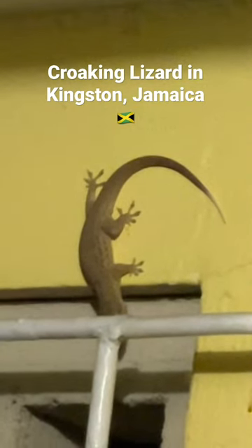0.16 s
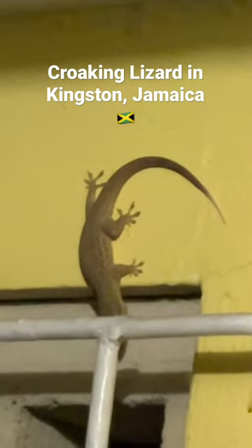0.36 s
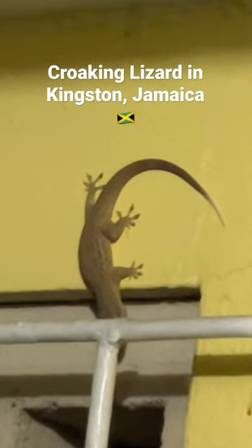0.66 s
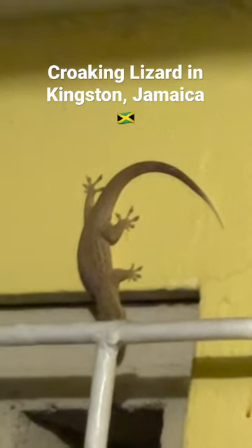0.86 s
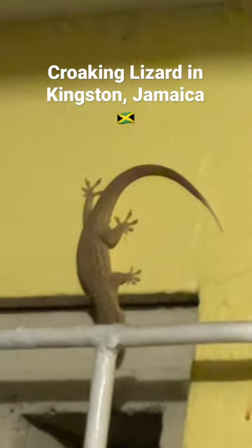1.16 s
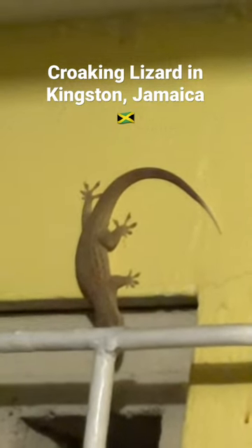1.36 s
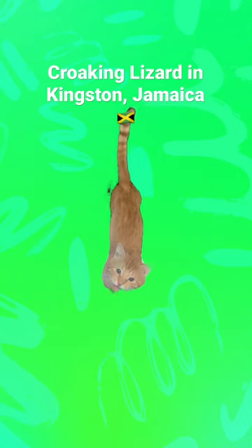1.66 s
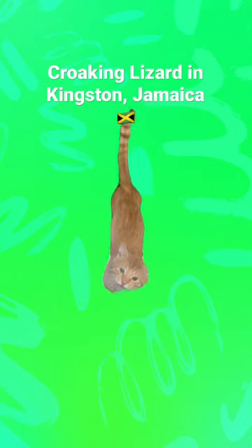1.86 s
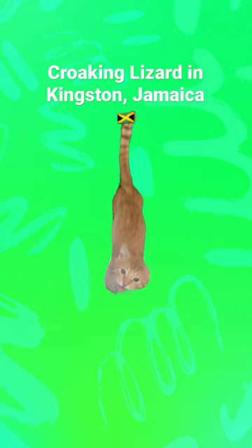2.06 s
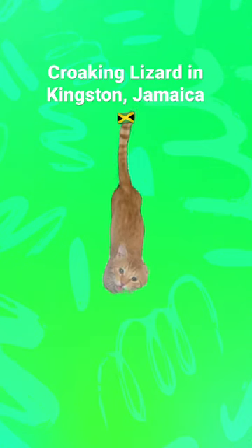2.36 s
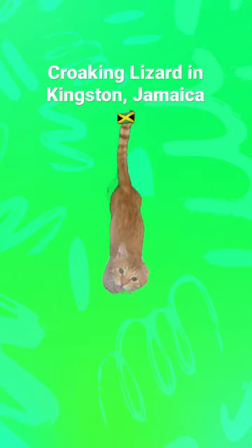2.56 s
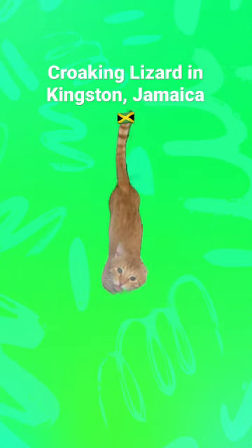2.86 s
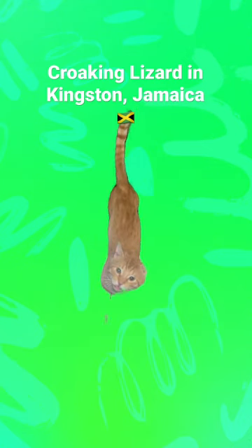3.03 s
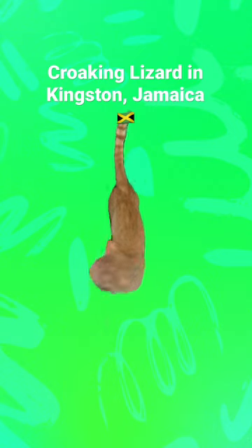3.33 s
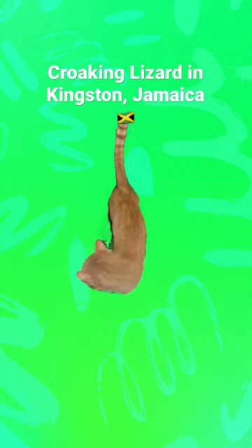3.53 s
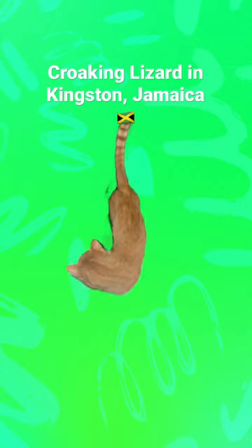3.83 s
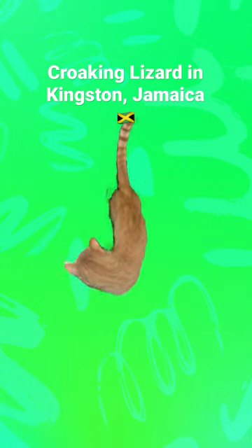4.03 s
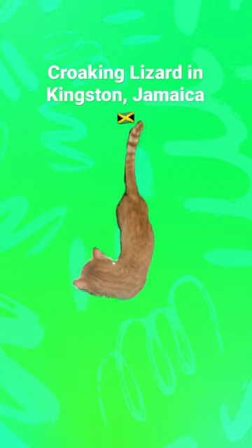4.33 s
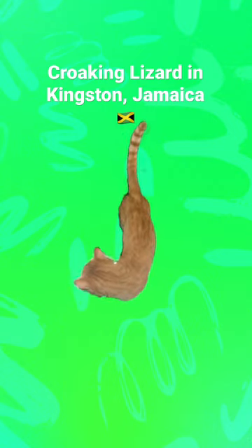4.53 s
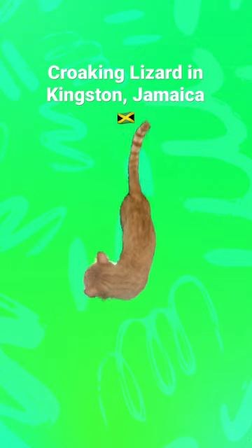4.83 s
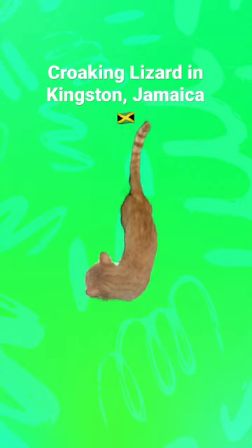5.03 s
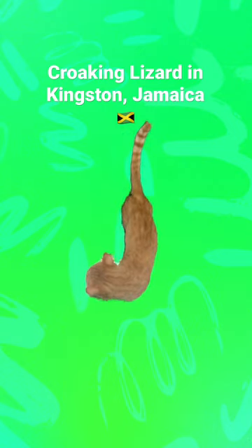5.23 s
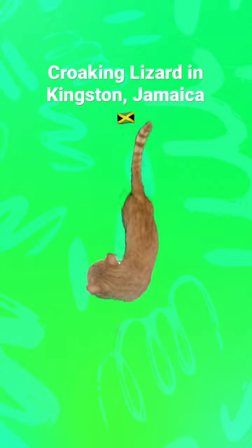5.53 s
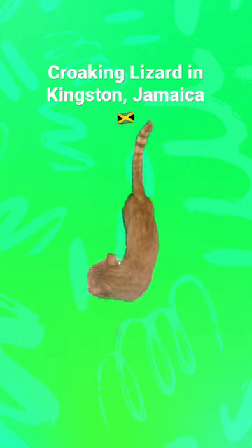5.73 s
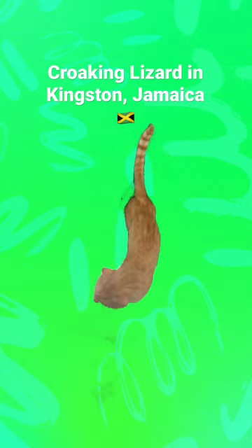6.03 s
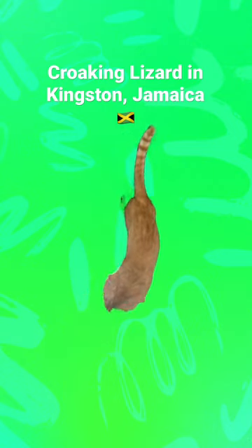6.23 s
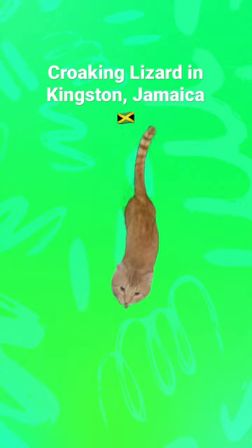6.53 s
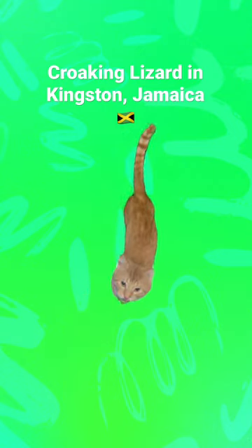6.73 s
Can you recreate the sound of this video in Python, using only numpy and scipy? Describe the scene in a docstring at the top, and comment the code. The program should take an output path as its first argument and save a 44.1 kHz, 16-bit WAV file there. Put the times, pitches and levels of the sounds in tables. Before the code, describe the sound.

A night yard heard through a hand-held phone. From 0 to 1.66 seconds, low town rumble lies under a high, throbbing cricket chorus, with a closer insect giving brief buzzing chirps near 0.3 and 0.9 and a clipped one at the end. A silence of about 0.04 seconds follows. At 1.7 a loud cat meow bursts in with a bright, hard edge, sinking gradually, growing rougher and wavering before shutting with a small breathy pop near 2.85. Beneath it, a gecko makes thirteen dry, hollow clicks from 1.71 to 2.45, strongest around 2.16. A blurred chirp follows at 2.9. The rumble is now softer; near chirps recur roughly every 0.6 seconds to the end at about 6.9, with faint echoes. A thin far trill comes and goes after 4.1. A scuff and crisp tick fall around 4.5, soft handling rustle from 5.2 to 5.9, and tiny scuffs near 6.2.

```python
"""A yard at night, heard through a hand-held phone in two shots with a brief silence between.
Far crickets (throbbing noise bands, pulsed calls, a thin trill) lie over town rumble (coloured noise).
A near insect chirps in trains of falling tones. The second shot opens on a long cat meow (summed
partials and breath noise) over a gecko's clicks (decaying ring and crack). A blurred chirp, ticks,
scuffs and a handling rustle (noise bursts) follow."""
import sys
import numpy as np
from scipy import signal
from scipy.fft import rfft, irfft
from scipy.io import wavfile
from scipy.ndimage import uniform_filter1d

SR = 44100
rng = np.random.default_rng(int(sys.argv[2]) if len(sys.argv) > 2 else 0)


def output_pcm(signal):
    """Save a mono or channel-first signal as 16-bit PCM at the path in sys.argv[1].

    Samples are clipped to [-1, 1] before scaling.
    """
    pcm = np.clip(np.atleast_2d(signal).T, -1, 1) * 32767
    wavfile.write(sys.argv[1], SR, np.round(pcm).astype(np.int16))


N = 303408

# silence between the shots: (start [s], end [s])
SILENCE_S = (1.6645, 1.7021)

# town rumble colour, first and second shot: (frequency [Hz], gain [dB])
TOWN_1_COLOUR = [(15, -67), (25, -16.5), (40, -14), (60, 6.5), (141, -4), (198, -4), (372, -12), (570, -11),
                 (914, -9), (1640, -16.5), (3220, -35), (4410, -47), (5400, -53), (7020, -90),
                 (11900, -120)]
TOWN_2_COLOUR = [(15, -79), (25, -29), (86, 3.5), (162, -9.5), (194, -2.5), (290, -14), (545, -16.5),
                 (623, -17.5), (1000, -21.5), (2570, -41), (2880, -44.5), (4510, -44.5), (5400, -53),
                 (7020, -77), (11900, -120)]
TOWN_1_RMS_DB, TOWN_2_RMS_DB = -50.5, -58
# wavering tones, second shot: (frequency [Hz], width [Hz], level [dB])
HUM_BANDS = [(104, 13, -68), (199.7, 6.9, -68.5), (534, 3, -75), (10200, 5.5, -106)]

# cricket chorus: (frequency [Hz], width [Hz], level [dB], throb rate [1/s], throb depth [dB], throb phase zero [s])
CHORUS_BANDS = [(5890, 500, -83.5, 6.75, 2.5, 3.13), (6294, 300, -74, 5.5, 1, 4.4),
                (6650, 300, -71.5, 4.3, 2, 5), (6900, 200, -70, 3, -0.5, 3.1),
                (7160, 300, -75, 2.1, 3.5, 3.1)]
# steadiest cricket: (time [s], level [dB])
STEADY_LEVEL = [(0, -65.5), (1.66, -74), (3.2, -72.5), (4.8, -66.5), (5.7, -69), (6.88, -66)]
# highest cricket, one row per shot: (first peak [s], end [s])
HIGH_SPANS = [(.13, 1.5), (2.17, 7.6)]
HIGH_PERIOD_S, HIGH_WIDTH_S, HIGH_HZ = 0.322, 0.075, 7120
HIGH_NOISE_DB, HIGH_SCATTER_DB = -63, 2.5  # noise level before it modulates the tone
# thin far trill: (start [s], length [s], level [dB])
TRILL_SPANS = [(4.095, 0.19, -91), (4.34, 0.5, -87.5), (5.168, 0.77, -85), (6.142, 0.18, -83.5),
               (6.445, 0.05, -92), (6.665, 0.19, -83.5)]
TRILL_HZ, TRILL_FADE_S = 4390, 0.074

# near insect: (time [s], level [dB], wing strokes [count], pitch [Hz])
CHIRPS = [(0.321, -55, 10, 3183), (0.883, -53.5, 10, 3180), (1.645, -48, 2, 3215), (1.923, -49, 9, 3110),
          (2.535, -50.5, 10, 3183), (3.299, -54.5, 10, 3162), (3.893, -53.5, 9, 3166),
          (4.552, -53, 9, 3146), (5.159, -54.5, 10, 3170), (5.802, -53.5, 9, 3155), (6.401, -53, 9, 3145)]
# its overtones: (multiple of the pitch [1], level against the tone [dB])
CHIRP_OVERTONES = [(3, -25.5), (4, -41)]
# wing noise under each stroke: (frequency [Hz], width [Hz], level against the stroke [dB])
SCRAPE_BANDS = [(3450, 480, -19), (10400, 2400, -34), (13000, 1500, -35.5)]
STROKE_S = 0.0116
FAR_WALL_S, FAR_WALL_DB = 0.115, -17  # one clear reflection repeats each chirp

# meow: (time [s], pitch [Hz], 2nd partial [dB], 3rd partial [dB], upper mouth resonance [dB])
MEOW = [(1.702, 792, -57, -32, -56), (1.708, 797.4, -48.5, -28, -59.5), (1.798, 782, -44.5, -34, -53.5),
        (1.824, 790.5, -46.5, -31.5, -53), (2.026, 750.8, -40.5, -41.5, -51.5),
        (2.104, 734, -38.5, -37.5, -52), (2.172, 756, -38.5, -42, -52), (2.228, 739, -34.5, -38.5, -49.5),
        (2.268, 731.3, -36.5, -42, -49), (2.436, 735.7, -32, -43.5, -50), (2.502, 716.7, -29.5, -42, -51),
        (2.524, 709, -28, -49, -49), (2.606, 722, -24.5, -45, -51), (2.648, 704, -27, -56, -58.5),
        (2.664, 713.4, -29.5, -51.5, -55), (2.726, 683.3, -32.5, -55.5, -57),
        (2.778, 698.5, -30.5, -50, -57), (2.814, 699.3, -44, -52.5, -56), (2.826, 699.6, -35.5, -53, -59),
        (2.85, 730.5, -40.5, -57, -59), (2.866, 704, -45, -86, -73), (2.87, 710, -53, -75, -71)]
# throat colour of partials 4 and 5 against the upper resonance: (frequency [Hz], gain [dB])
THROAT_COLOUR = [(2740, -19.5), (2850, -4), (2940, -2), (3060, -1), (3150, -8), (3500, -2.5), (3700, -6.5),
                 (3790, -16), (3900, -1), (4000, -4)]
# mouth colour of partials 10 to 19: (frequency [Hz], gain [dB])
MOUTH_COLOUR = [(7000, -3.5), (8000, -2.5), (9000, -13.5), (10000, -11), (11500, -13.5), (13000, -20.5),
                (15000, -30)]
# breath as the mouth shuts, a pop then a sigh: (time [s], level [dB], rise [s], t60 [s])
PUFFS = [(2.848, -50, 0.0084, 0.13), (2.88, -59, 0.029, 0.27)]
# breath colour: (frequency [Hz], width [Hz], level [dB])
PUFF_BANDS = [(650, 300, -3.5), (1940, 2900, -0.5), (3250, 860, -12), (6240, 1600, -6),
              (10200, 4220, -24.5)]
UPPER_MOUTH_HZ, UPPER_WIDTH_HZ = 5700, 470
FUNDAMENTAL_DB, CLOSING_DB, CLOSING_S = -50.5, 7, 0.03  # 1st partial lifts as the mouth shuts
TOP_DB, TOP_FOLLOWS = -60, 0.43  # top partials rise by this share of the 2nd partial's dB
VOICE_ATTACK_S, VOICE_STOP_S = 0.018, 0.0069
ONSET_DB, ONSET_DECAY_S = 13.5, 0.0092  # bright, hard start
TIRES_S, TIRED_FLUTTER_DB = 2.66, 2.5  # from here the voice wavers
SLACK_S, SLACK_HZ_PER_S = 2.856, 7000  # the folds slacken and the pitch drops away

# gecko clicks: (time [s], ring level [dB], throat pitch [Hz], crack level [dB])
CLICKS = [(1.7113, -45, 1810, -37), (1.8791, -40.5, 1940, -39.5), (1.895, -38, 1860, -42),
          (1.9876, -34, 1860, -36.5), (2.0318, -44, 1790, -58), (2.0742, -40, 1850, -53),
          (2.158, -27.5, 1840, -39.5), (2.254, -37.5, 1790, -56), (2.298, -50, 1730, -57.5),
          (2.3276, -44.5, 1790, -51), (2.3707, -41.5, 1797, -47), (2.4069, -39.5, 1720, -39),
          (2.4463, -42.5, 1800, -56)]
CLICK_RING_DECAY_S, CLICK_CRACK_DECAY_S, CLICK_RISE_S = 0.004, 0.0065, 0.00064

# ticks, scuffs and a blurred insect chirp at 2.897 s:
# (time [s], level [dB], frequency [Hz], width [Hz], rise [s], t60 [s])
SMALL_SOUNDS = [(2.897, -51, 3230, 448, 0.013, 0.28), (3.636, -69, 3680, 600, 0.0025, 0.15),
                (4.12, -84, 11000, 3990, .003, 0.04), (4.499, -63.5, 1100, 900, 0.019, .2),
                (4.584, -56.5, 5840, 1200, 0.0011, 0.038), (5.884, -71, 2000, 900, 0.0036, 0.092),
                (5.886, -78, 4900, 900, .003, .05), (6.166, -77, 2300, 1310, 0.0075, 0.18),
                (6.159, -80, 10000, 6000, 0.0022, .03), (6.235, -74.5, 2100, 1300, 0.012, 0.16),
                (6.325, -72.5, 2060, 1287, 0.0068, 0.26)]
# hand rubbing the phone: (time [s], level [dB], rise [s], t60 [s])
RUSTLES = [(5.16, -70.5, .016, 0.43), (5.29, -81, .035, .25), (5.38, -76.5, .02, .5),
           (5.43, -79, 0.026, .5), (5.505, -73, .02, 0.24), (5.66, -78.5, .045, .3), (5.8, -83.5, .025, .4)]
# rub colour: (frequency [Hz], width [Hz], level [dB])
RUSTLE_BANDS = [(2180, 1300, -7.5), (4700, 2500, -4), (7890, 4100, -1), (10790, 2400, -3.5),
                (13400, 2000, -11.5)]

HISS_DB, TOP_HZ = -87, 15700  # microphone noise, upper limit


def undb(db):
    """Decibels to gain."""
    return 10 ** (np.asarray(db) / 20)


def level(x, db):
    """Scale to an rms level."""
    return x * undb(db) / np.sqrt(np.mean(x ** 2))


def curve(rows):
    """Columns of a table at every sample; -150 outside its span."""
    s, *columns = np.transpose(rows)
    return [np.interp(np.arange(N) / SR, s, c, -150, -150) for c in columns]


def colour_db(hz, rows):
    """Table gain at a frequency."""
    return np.interp(hz, *np.transpose(rows))


def band(x, hz, width_hz):
    """Steep resonance: a bell on the frequency axis."""
    f = np.arange(N // 2 + 1) * SR / N
    return irfft(rfft(x) / (1 + ((f - hz) * 2 / width_hz) ** 4), N)


def hiss(bands):
    """Noise in a set of resonances, each at its own rms level."""
    return sum(level(band(rng.standard_normal(N), hz, w), db) for hz, w, db in bands)


def walk(rate):
    """Random levels held 1 / rate s and slewed twice; spread near 1."""
    k = int(SR / rate)
    steps = np.repeat(rng.standard_normal(N // k + 1), k)
    return 1.3 * uniform_filter1d(uniform_filter1d(steps, k), k)[:N]


def bursts(rows):
    """Envelope of overlapping bursts, each a straight rise and an exponential fall."""
    t = np.arange(N) / SR
    return sum(undb(db) * np.clip((t - s) / rise, 0, 1)
               * np.exp(-np.log(1000) * np.maximum(t - s - rise, 0) / t60)
               for s, db, rise, t60 in rows)


def add(out, s, sound):
    """Mix a sound in at time s."""
    i = int(s * SR)
    out[i:i + len(sound)] += sound[:N - i]


def echo(x, t60, wet_db, delay_s):
    """Direct sound plus a decaying cloud of reflections off the walls."""
    t = np.arange(SR) / SR
    cloud = rng.standard_normal(SR) * np.exp(-np.log(1000) * t / t60) * (t > delay_s)
    cloud = cloud / np.sqrt(np.sum(cloud ** 2))
    return x + signal.fftconvolve(x, cloud)[:N] * undb(wet_db)


def town(colour, rms_db):
    """Coloured noise in two bands, below and above 300 Hz, that swell slowly and apart."""
    f = np.arange(N // 2 + 1) * SR / N
    hz, gain_db = np.transpose(colour)
    gain = undb(np.interp(np.log(f + 1), np.log(hz), gain_db))
    noise = irfft(rfft(rng.standard_normal(N)) * gain, N)
    low = band(noise, 0, 600)
    swelling = low * undb(1.2 * walk(4.3)) + (noise - low) * undb(0.93 * walk(1.9))
    return level(swelling, rms_db)


def chorus():
    """Crowds of far singers blur into throbbing noise bands; one band holds steadier."""
    t, out = np.arange(N) / SR, np.zeros(N)
    for hz, width_hz, db, rate, depth_db, peak_s in CHORUS_BANDS:
        throb = np.cos(2 * np.pi * rate * (t - peak_s) + 0.3 * walk(0.84)) + 0.5 * walk(rate)
        out += undb(depth_db * throb + 0.4 * walk(60)) * hiss([(hz, width_hz, db)])
    steady = undb(curve(STEADY_LEVEL)[0] + 0.82 * walk(30))
    return out + steady * hiss([(6496, 170, 0)])


def high_cricket():
    """Bell-shaped calls on a steady beat: a tone modulated by low noise, with a 32 Hz ripple."""
    t, half_s, calls = np.arange(N) / SR, HIGH_PERIOD_S / 2, np.zeros(N)
    for first_s, end_s in HIGH_SPANS:
        from_peak_s = (t - first_s + half_s) % HIGH_PERIOD_S - half_s
        active = (t > first_s - half_s) * (t < end_s)
        calls += np.exp(-(from_peak_s / HIGH_WIDTH_S) ** 2) * active
    calls = calls * (1 + 0.13 * np.sin(2 * np.pi * 32 * t)) * undb(HIGH_SCATTER_DB * walk(3))
    return calls * hiss([(0, 240, HIGH_NOISE_DB)]) * np.sin(2 * np.pi * HIGH_HZ * t)


def far_trill():
    """A thin tone, faded in and out, unsteady in pitch and level."""
    t = np.arange(N) / SR
    envelope = sum(undb(db) * np.clip(np.minimum(t - s, s + length_s - t) / TRILL_FADE_S, 0, 1)
                   for s, length_s, db in TRILL_SPANS)
    phase = 2 * np.pi * np.cumsum(TRILL_HZ + 8 * walk(40)) / SR
    flutter = undb(2 * walk(70) + 2.5 * walk(12))
    return np.sqrt(2) * envelope * flutter * np.sin(phase)


def chirper():
    """Every wing stroke is a tone falling in pitch, with overtones and scrape; the yard smears it."""
    tone, overtones, beat = np.zeros(N), np.zeros(N), np.zeros(N)
    t = np.arange(int(STROKE_S * SR)) / SR
    for s, db, strokes, hz in CHIRPS:
        scatter = rng.standard_normal((12, 3))[:round(strokes)]
        for k, (tune, size, late) in enumerate(scatter):
            # first strokes are softer and sharper
            ratio = 1.03 - 0.061 * t / STROKE_S + 0.0092 * tune + 0.01 * np.exp(-k / 0.69)
            phase = 2 * np.pi * np.cumsum(hz * ratio) / SR
            stroke = undb(db - 14 * np.exp(-k) + 1.9 * size) * np.sin(np.pi * t / STROKE_S)
            start_s = s + k * STROKE_S + 0.001 * late * (k > 0)
            add(tone, start_s, stroke * np.sin(phase))
            add(overtones, start_s, stroke * sum(undb(g) * np.sin(m * phase) for m, g in CHIRP_OVERTONES))
            add(beat, start_s, stroke)
    add(tone, FAR_WALL_S, undb(FAR_WALL_DB) * tone)
    smeared = echo(echo(tone, 0.08, -4.5, 0.002), 0.35, -10, 0.04)
    return smeared + echo(overtones + beat * hiss(SCRAPE_BANDS), 0.15, -6.5, 0.004)


def cat():
    """Partials on a sinking pitch; upper ones pass the mouth's resonances and break up as folds flutter."""
    t = np.arange(N) / SR
    start_s, end_s = MEOW[0][0], MEOW[-1][0]
    hz, second_db, third_db, mid_db = curve(MEOW)
    hz = np.maximum(hz - SLACK_HZ_PER_S * np.maximum(t - SLACK_S, 0), 0)
    hz = hz * (1 + 0.003 * walk(70) + 0.002 * walk(20))
    phase = 2 * np.pi * np.cumsum(hz) / SR

    onset_db = ONSET_DB * np.exp(-np.maximum(t - start_s, 0) / ONSET_DECAY_S)
    top_db = TOP_DB + TOP_FOLLOWS * second_db + onset_db
    tired_db = TIRED_FLUTTER_DB * np.clip((t - TIRES_S) / 0.035, 0, 1) * walk(60)
    second_db = second_db + tired_db
    third_db = third_db + 0.4 * onset_db + tired_db
    mid_db = mid_db + tired_db

    attack = np.clip((t - start_s) / VOICE_ATTACK_S, 0, 1)  # 1st partial only
    closing_db = CLOSING_DB * np.exp((t - end_s).clip(None, 0) / CLOSING_S)
    voice = attack * undb(FUNDAMENTAL_DB + closing_db + 1.2 * walk(14)) * np.sin(phase)
    voice += undb(second_db + 0.37 * walk(30)) * np.sin(2 * phase)
    voice += undb(third_db + 0.8 * walk(30)) * np.sin(3 * phase)
    for k in range(4, 6):
        db = mid_db + colour_db(k * hz, THROAT_COLOUR) + 2.5 * walk(24.98)
        voice += undb(db) * np.sin(k * phase)
    for k in range(6, 10):
        resonance_db = -10 * np.log10(1 + ((k * hz - UPPER_MOUTH_HZ) / UPPER_WIDTH_HZ) ** 2)
        db = mid_db + resonance_db - 1.5 + 3.5 * walk(22)
        voice += undb(db) * np.sin(k * phase + 2 * np.pi * rng.random())
    for k in range(10, 20):
        db = top_db + colour_db(k * hz, MOUTH_COLOUR) + 5 * walk(16) + 2.5 * walk(120)
        voice += undb(db) * np.sin(k * phase + 0.7 * walk(150))

    breath = undb(mid_db) * hiss([(5160, 5600, -20.5)])
    breath += undb(third_db) * hiss([(1850, 530, -25)])
    breath += undb(top_db) * hiss([(10500, 3500, -10.5)])
    sounding = np.clip((end_s - t) / VOICE_STOP_S, 0, 1) * (t > start_s)
    puff = bursts(PUFFS) * undb(2.1 * walk(150)) * hiss(PUFF_BANDS)
    return echo((np.sqrt(2) * voice + breath) * sounding + puff, 0.65, -16, 0.015)


def gecko():
    """Each click rings the throat and carries a brief noise crack."""
    out, t = np.zeros(N), np.arange(SR // 20) / SR
    crack_filter = signal.butter(4, (1700, 6200), "band", fs=SR, output="sos")
    for s, ring_db, hz, crack_db in CLICKS:
        ring = undb(ring_db) * np.sin(2 * np.pi * hz * t) * np.exp(-t / CLICK_RING_DECAY_S)
        crack = undb(crack_db) * rng.standard_normal(len(t)) * np.exp(-t / CLICK_CRACK_DECAY_S)
        crack = signal.sosfilt(crack_filter, crack)
        add(out, s, (ring + crack) * (1 - np.exp(-t / CLICK_RISE_S)))
    return echo(out, 0.25, -9, 0.005)


def small_sounds():
    """Ticks, scuffs and one blurred chirp are coloured noise bursts."""
    return sum(bursts([(s, db, rise, t60)]) * hiss([(hz, width_hz, 0)])
               for s, db, hz, width_hz, rise, t60 in SMALL_SOUNDS)


def rustle():
    """A hand's rub is grainy coloured noise under overlapping bursts."""
    return bursts(RUSTLES) * undb(2.4 * walk(200)) * hiss(RUSTLE_BANDS)


def scene():
    """All sources; the first shot faces the noisier street."""
    first_shot = np.arange(N) / SR < SILENCE_S[1]
    floor = np.where(first_shot, town(TOWN_1_COLOUR, TOWN_1_RMS_DB),
                     town(TOWN_2_COLOUR, TOWN_2_RMS_DB) + hiss(HUM_BANDS))
    insects = chorus() + high_cricket() + far_trill() + chirper()
    return (floor + insects + cat() + gecko() + small_sounds() + rustle())[None]


def record(dry):
    """Microphone self-noise and bass cut, the silence between the shots, a steep top."""
    t = np.arange(N) / SR
    mic = dry + hiss([(4720, 5500, HISS_DB), (11600, 9400, HISS_DB - 5.5)])
    mic = signal.sosfilt(signal.butter(3, 36, "high", fs=SR, output="sos"), mic)
    mic = mic * ((t < SILENCE_S[0]) | (t > SILENCE_S[1]))
    return signal.sosfilt(signal.ellip(8, 0.2, 70, TOP_HZ, fs=SR, output="sos"), mic)


dry = scene()
out = record(dry)
output_pcm(out)
```